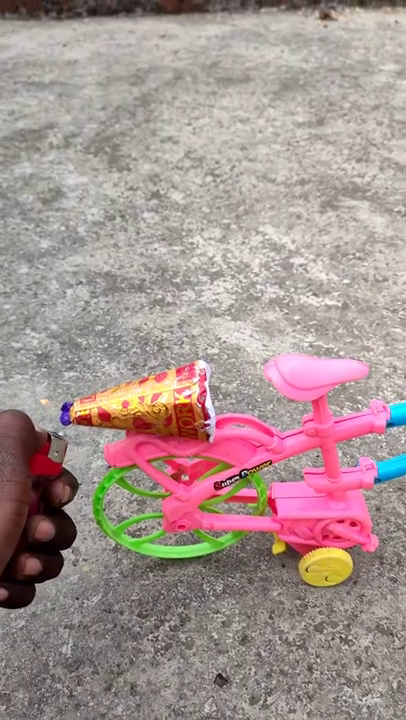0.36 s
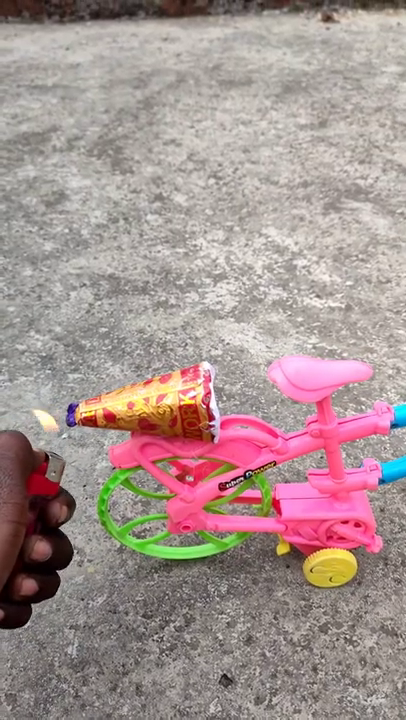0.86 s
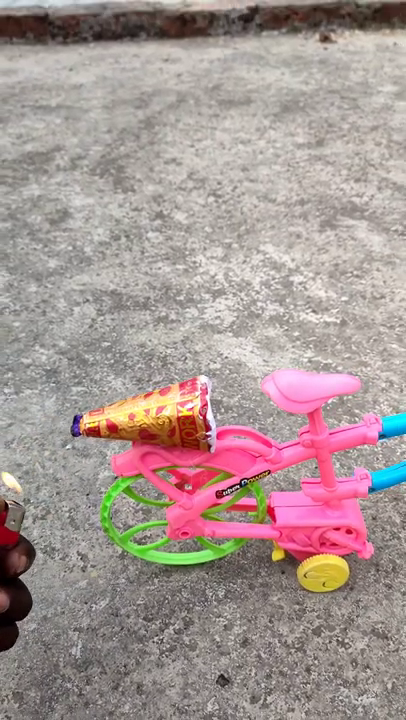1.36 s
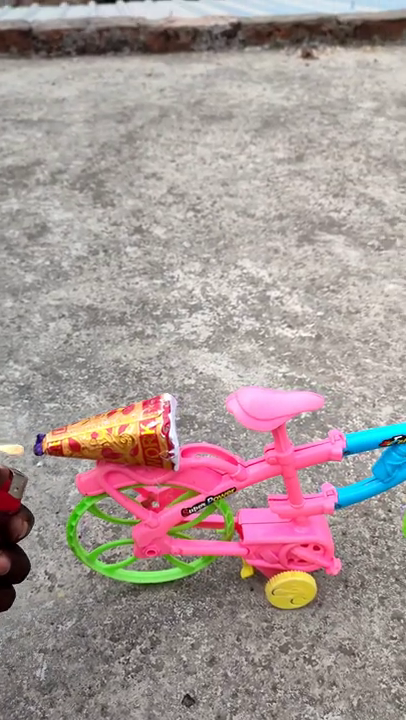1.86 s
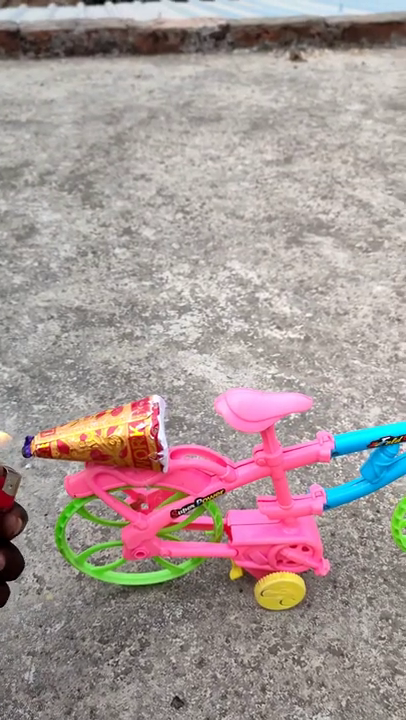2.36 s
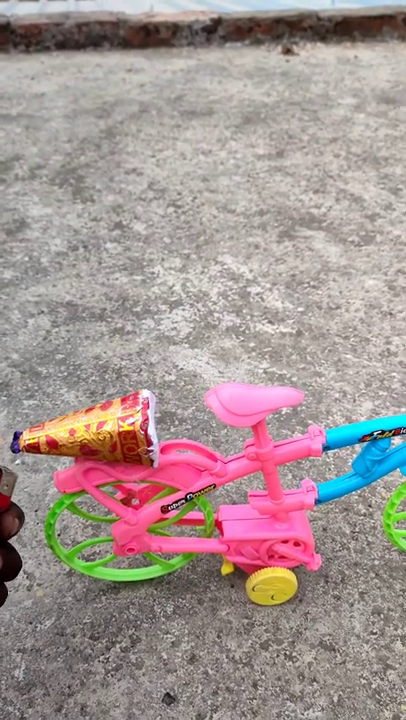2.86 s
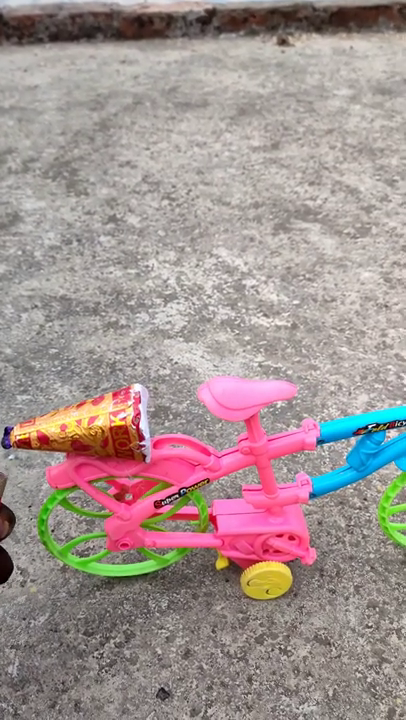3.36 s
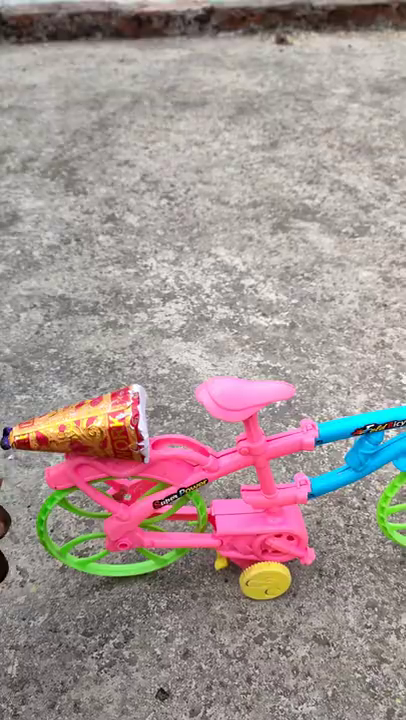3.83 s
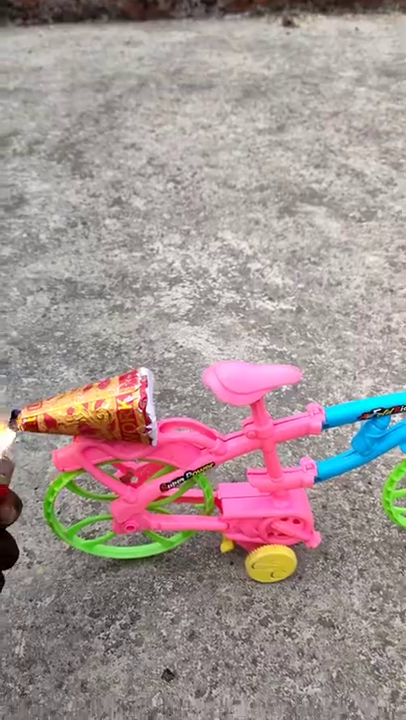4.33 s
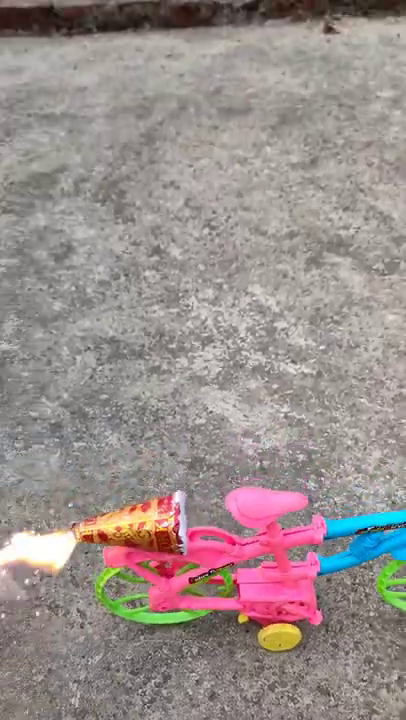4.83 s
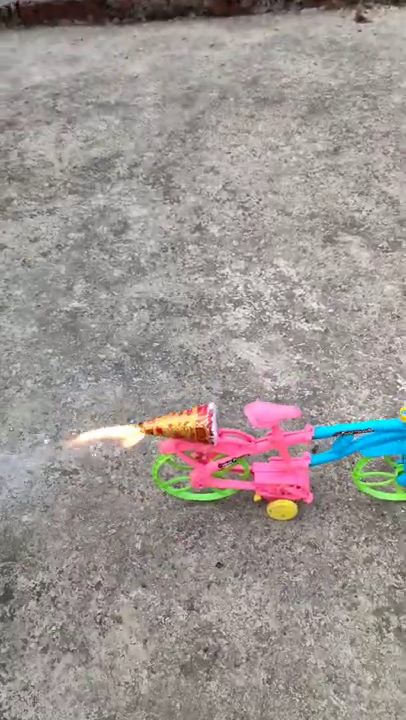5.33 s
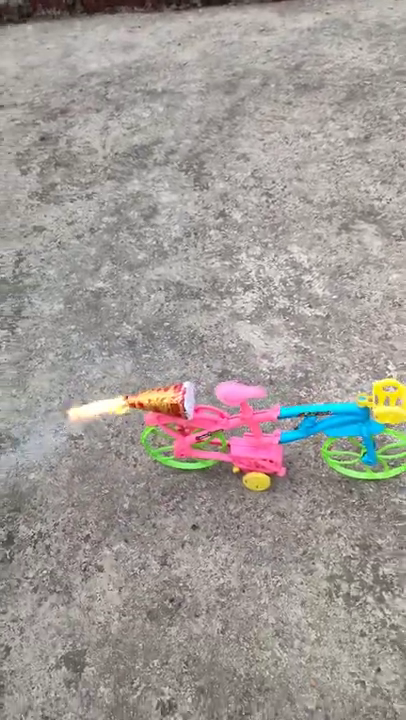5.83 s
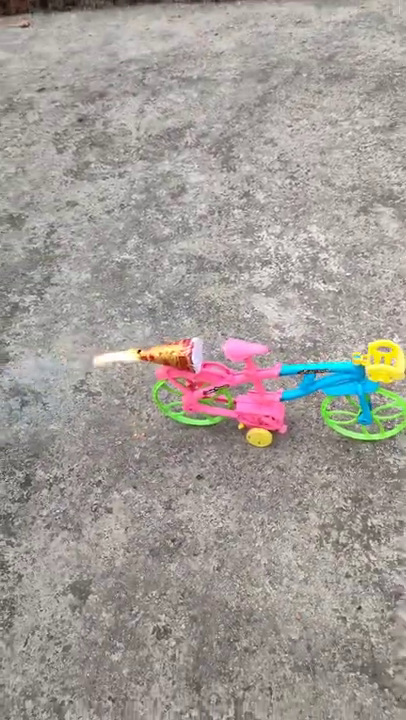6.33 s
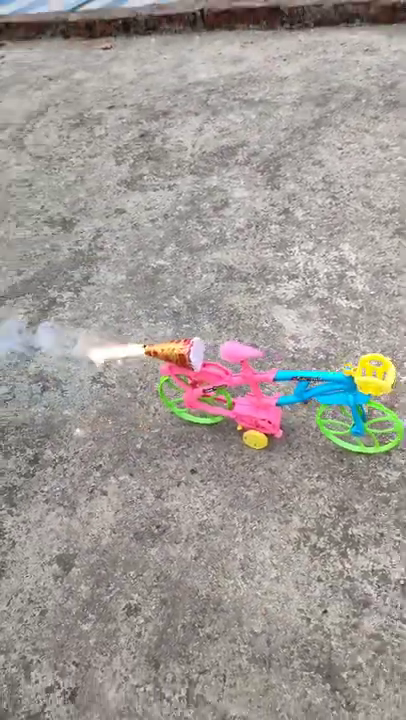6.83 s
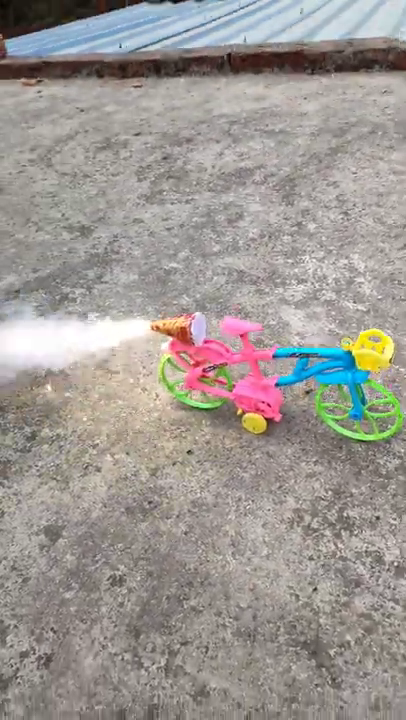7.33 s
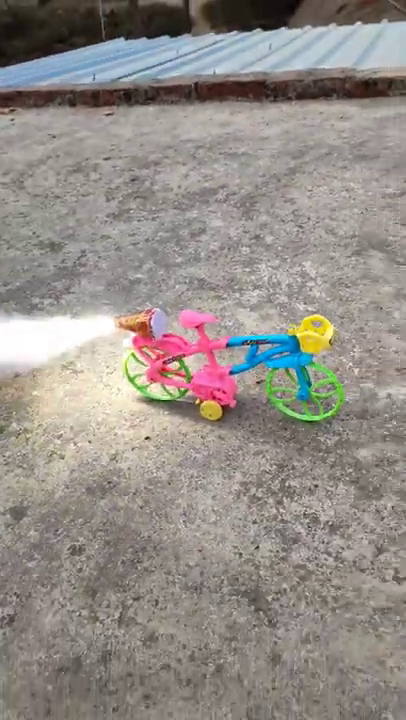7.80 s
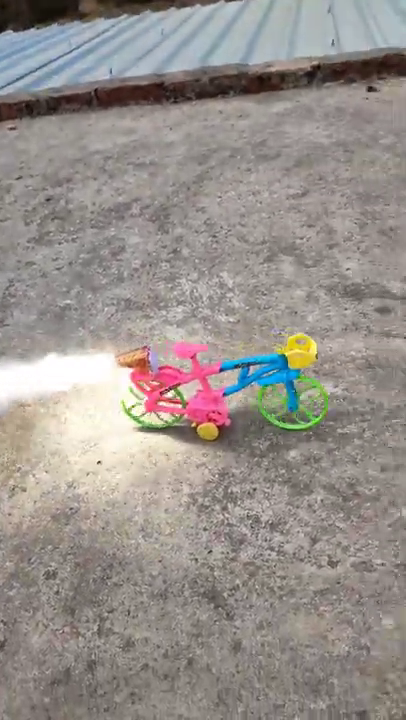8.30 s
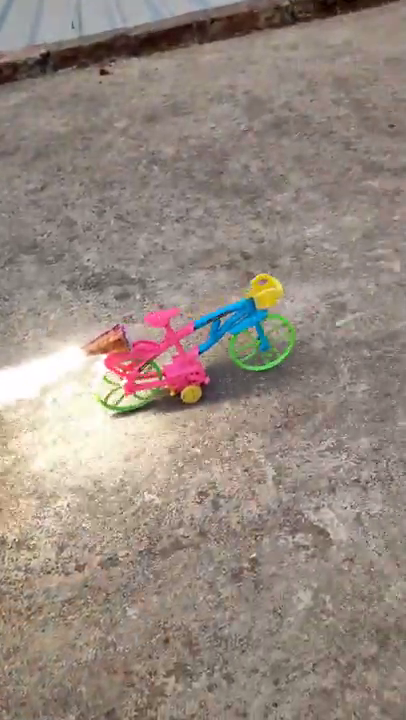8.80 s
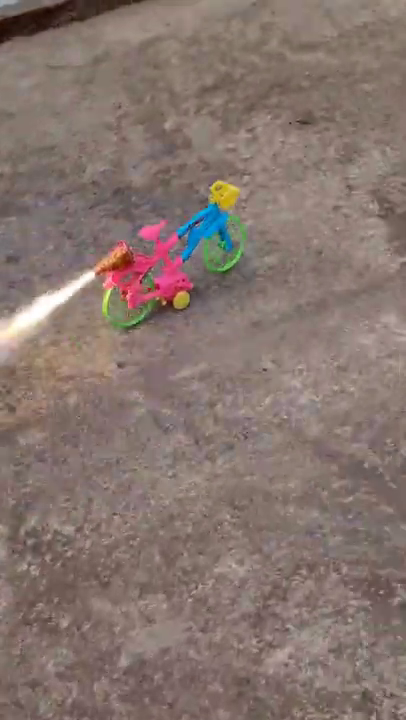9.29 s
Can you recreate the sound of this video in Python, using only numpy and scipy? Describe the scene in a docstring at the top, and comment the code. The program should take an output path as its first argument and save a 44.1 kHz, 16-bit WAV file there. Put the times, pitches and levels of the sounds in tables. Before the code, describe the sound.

Quiet birdsong over distant traffic, then a small firework fuse spits sharp crackles, hisses thinly, and bursts into a loud roaring jet that dies abruptly.

```python
"""Birds whistle, chirp and coo as gliding near-sines over shaped noise for far traffic and wind.
After faint ticks and scrapes the tip of a cone fountain on a toy bicycle lights on a concrete roof:
uneven noise hisses, noise bursts spark. Then the charge catches: a noise jet roars, combed by its
ground echo, swells as the toy turns, and dies away.
Two microphones a hand apart hear the sources with their own colour, level or delay."""
import sys
import numpy as np
from scipy import signal
from scipy.io import wavfile
from scipy.ndimage import uniform_filter1d

SR = 44100
rng = np.random.default_rng(int(sys.argv[2]) if len(sys.argv) > 2 else 0)


def volts(x):
    """Linear amplitude factor 10**(x/20) for a level x in dB, scalar or array-like."""
    e = np.asarray(x, float) / 20
    return 10 ** e


def unload_audio(sound):
    """Save the sound as a 16-bit wav file, at the path given as the first command line argument."""
    columns = np.transpose(np.atleast_2d(sound))
    # keep every value between -1 and 1, then stretch to whole-number steps
    steps = np.round(np.clip(columns, -1, 1) * 32767)
    wavfile.write(sys.argv[1], SR, steps.astype(np.int16))


N = 426447
FRAME = 512  # samples; frames overlap by three quarters
HZ = np.fft.rfftfreq(FRAME, 1 / SR)[:, None]
TIMES = np.arange(4 * N // FRAME + 5) * FRAME / 4 / SR

# Jet spectrum before tilt and comb. Each row: frequency in Hz, left in dB, right in dB.
JET_SPECTRUM = [(60.4, -33, -39), (152, -4.5, -6.5), (258, -1.5, -4.5), (750, 0, -3), (1020, -3.5, -5),
                (2200, -4.5, 7.5), (3000, -5, -7), (3300, -6.5, -8), (4400, -4, -5), (4870, -7, -9.5),
                (6000, -13, -6.5), (6480, -15.5, -13), (7000, -16, -19.5), (7700, -20, -21),
                (10200, -24.5, -19.5), (13800, -31, -23), (16500, -36, -32)]
# Jet likeness of the two sides. Each row: frequency in Hz, likeness 0-1.
JET_LIKENESS = [(300, 1), (800, 0.8), (2200, 0.66), (3300, 0.27), (6000, 0.74), (8000, 0.13)]
# Jet strength. Each row: time in s, level in dB.
JET_LEVEL = [(6.9, -69), (6.97, -37), (7.05, -32.5), (7.11, -33), (7.18, -34), (7.24, -34), (7.32, -26.5),
             (7.5, -20.5), (7.88, -12), (8.09, -12), (8.26, -9), (8.5, -11), (8.61, -12), (8.7, -10),
             (9.03, -10.5), (9.31, -11), (9.46, -17), (9.52, -21.5), (9.59, -33), (9.67, -42.5)]
# Nozzle facing the microphones as the toy turns. Each row: time in s, facing (0 = side-on).
NOZZLE_FACING = [(6.9, -0.26), (8.3, 0.41), (8.62, 0.86), (9.05, 0.96), (9.3, 0.72), (9.48, -0.23),
                 (9.67, 1)]
# Ground echo, moving with toy and microphones. Each row: time in s, first left notch in Hz.
ECHO_NOTCH = [(6.9, 840), (7.17, 900), (7.3, 1170), (7.6, 1300), (8.1, 1240), (8.36, 1086), (9.2, 974),
              (9.67, 1200)]
# Ground echo strength. Each row: frequency in Hz, left factor, right factor.
ECHO_STRENGTH = [(506, 1, 0.85), (1200, 0.73, 0.88), (3200, 0.64, 0.19), (5000, 0.49, 0.025),
                 (8000, 0.19, 0.03)]
# Burning tip spectrum before tilt. Each row: frequency in Hz, left in dB, right in dB.
FLAME_SPECTRUM = [(100, -39, -36), (400, -5, -10), (800, -13, -8), (1500, -10, -2), (2480, -17, 8.5),
                  (2940, -21.5, 3.5), (4500, -17, -2), (5760, -18.5, -2.5), (6500, -33, -15),
                  (8000, -36, -18), (10300, -45, -20.5), (12500, -50, -22.5), (15300, -50, -20)]
# Flame likeness of the two sides. Each row: frequency in Hz, likeness 0-1.
FLAME_LIKENESS = [(300, 1), (1200, 0.095), (2500, 0.38), (4000, 0.29), (7000, 0.065)]
# Burning tip, drifting across. Each row: time in s, level in dB, added left over right in dB.
FLAME_LEVEL = [(4.3, -48.5, 14), (4.7, -41, 21.5), (5, -43, 14), (5.4, -39, 17), (5.55, -40.5, 10.5),
               (6.2, -38.5, 7.5), (6.9, -37, 7.5), (7.3, -33, 19)]
# Bursting sparks. Each row: start in s, peak in dB before panning, centre in Hz,
# added left over right in dB, time to the envelope peak in ms.
SPARK_BURSTS = [(4.566, -25, 5000, -1, .3), (4.6095, -9, 5000, -7, 1.3), (4.7362, -5.5, 3900, 7.5, 1.7),
                (4.7464, -30, 4000, 13, 0.98), (4.8005, -15.5, 4000, 10, 0.54),
                (4.8922, -9, 4800, -10, 0.61), (4.9435, -2, 4670, -5, 0.42), (4.952, -21, 5900, 7, 1.2),
                (4.974, -22.5, 2540, -6, 1.2), (4.999, -10, 4500, 3, 0.46), (5.0256, -13, 4840, -5, 0.85),
                (5.0774, -10, 4760, -8, 1.2), (5.0896, -12, 4500, -11, 2), (5.0948, -3.5, 2630, -9.5, 0.76),
                (5.106, -15, 4000, 6, 1.3), (5.2139, -13, 3000, -11, 0.48), (5.2968, -19, 1690, -20, 0.38),
                (9.4295, -11, 5900, -8, .6), (9.509, -19, 5000, -16, .5)]
# Cone knocks under some bursts. Each row: start in s, level in dB.
CONE_KNOCKS = [(5.0778, -17.5), (5.2136, -20), (5.096, -23), (5.297, -26)]
# Single dry clicks. Each row: start in s, level in dB, left over right in dB.
DRY_CLICKS = [(4.5547, -9.5, 19.5), (4.733, -17, 5)]
# Soft noise puffs: first faint ticks and scrapes, then spurts of the burning tip.
# Each row: centre in s, level in dB, half length at half height in s, frequency in Hz,
# width of each resonance in Hz.
NOISE_PUFFS = [(2.711, -55, .003, 4500, 2500), (3.428, -57, 0.0054, 3500, 4000),
               (3.63, -61, 0.01, 5500, 3000), (3.7, -58, 0.0042, 5000, 7000),
               (3.775, -58, 0.0052, 6000, 7000), (3.837, -59, 0.009, 5000, 7000),
               (4.362, -45, 0.0061, 5400, 3000), (5.197, -32, 0.012, 5570, 1800),
               (5.198, -37.5, 0.013, 2500, 3000), (5.199, -43, .012, 11000, 9000),
               (5.344, -35.5, 0.017, 4500, 4000), (5.345, -44, 0.012, 11000, 9000),
               (5.418, -44, .004, 9000, 9000), (5.997, -41.5, 0.02, 5800, 6100),
               (6.149, -35, 0.014, 5740, 800), (6.354, -36.5, 0.02, 5570, 900),
               (6.36, -41.5, 0.018, 7000, 6000), (6.886, -33, 0.016, 5370, 1200),
               (7.637, -18, 0.0098, 2380, 2010), (9.62, -34.5, 0.0096, 2330, 900)]
# Whistles climbing to a hook, slowing and fading through the phrase. Each row: start in s, length in s.
RISING_WHISTLES = [(0.05, 0.12), (0.231, 0.13), (0.42, 0.15), (0.62, 0.14), (0.819, 0.14), (1.022, .148),
                   (1.236, 0.16), (1.454, 0.178), (1.693, 0.208), (1.968, 0.24), (2.29, 0.24),
                   (2.629, 0.26)]
# Ending of each rising whistle. Each row: time from its end in s, pitch in Hz.
RISE_HOOK = [(-.026, 6770), (0, 6560)]
# Quick upward calls. Each row: reference time in s, level in dB.
WHIP_CALLS = [(0.647, -51.5), (0.975, -50.5), (3.681, -49.5), (4.063, -48.5), (4.426, -43)]
# Shape of an upward call. Each row: time from its reference in s, pitch in Hz, relative level in dB.
WHIP_SHAPE = [(-.015, 2050, -19), (.015, 2250, -12.5), (.034, 2720, -6), (.048, 3206, 7), (.056, 3700, -1),
              (0.075, 3900, 5)]
# Nearest call, up then down. Each row: time in s, pitch in Hz, level in dB.
NEAR_SWOOP = [(3.862, 3590, -56), (3.87, 5300, -40), (3.879, 5980, -47), (3.903, 5100, -38.5),
              (3.926, 4820, -47), (3.95, 3530, -59)]
# Other birds. Each row: start in s, length in s, from Hz, to Hz, level in dB.
CHIRP_NOTES = [(0.24, 0.034, 4280, 5530, -50), (0.267, 0.015, 3740, 3000, -55),
               (0.328, 0.022, 3670, 2980, -53.5), (0.458, 0.014, 3680, 3100, -55),
               (0.52, 0.022, 3080, 3290, -53), (0.843, 0.032, 4700, 4920, -51),
               (0.874, 0.06, 3100, 2490, -59), (1.125, .05, 1950, 2700, -63), (1.89, .03, 3130, 3140, -61),
               (2.044, 0.077, 3870, 2500, -54.5), (2.377, 0.041, 5100, 4730, -53),
               (2.518, 0.06, 3190, 2410, -55), (2.608, 0.046, 3300, 2670, -57),
               (2.792, 0.053, 3170, 2680, -58), (3.836, .022, 4300, 6100, -51),
               (3.432, 0.024, 4200, 4900, -56), (3.742, .014, 4400, 5000, -54),
               (3.465, 0.022, 3450, 3750, -57), (5.027, 0.037, 4100, 4560, -39),
               (6.149, 0.047, 4560, 3840, -46)]
# Notes that hold, then bend. Each row: start in s, length in s, from Hz, to Hz, level in dB.
BENT_NOTES = [(.715, .042, 4450, 4300, -63), (1.513, .09, 1286, 1230, -58), (1.943, 0.065, 3880, 3960, -63),
              (3.143, 0.068, 3460, 3210, -52), (3.235, 0.058, 3590, 3470, -56.5),
              (3.998, 0.031, 3330, 2950, -60), (4.118, 0.046, 6200, 6160, -65),
              (4.135, 0.057, 3150, 2780, -62), (6.434, 0.062, 3330, 3120, -43),
              (6.628, 0.07, 3480, 3200, -44.5)]
# Hoarse squawks, mostly falling. Each row: start in s, length in s, from Hz, to Hz, level in dB.
HOARSE_SQUAWKS = [(1.545, .05, 3850, 3100, -58), (1.595, .065, 3600, 2400, -57),
                  (2.335, .065, 4500, 3750, -59), (2.722, .062, 4900, 2800, -56),
                  (2.972, .05, 3100, 4350, -60), (4.432, .03, 4200, 3500, -52)]
# Far dove. Each row: start in s, length in s, from Hz, to Hz, level in dB.
DOVE_COOS = [(.4, 0.2, 612, 571, -57.5), (.68, 0.13, 515, 509, -59), (1.78, 0.29, 620, 600, -59.5),
             (2.04, 0.075, 600, 593, -57), (2.93, 0.23, 527, 531, -56.5)]
# Distant traffic and wind spectrum. Each row: frequency in Hz, left in dB, right in dB.
AIR_SPECTRUM = [(40, -2.5, -0.5), (80, -1, -1.5), (196, -4, -2.5), (560, -6.5, -7), (900, -10.5, -9.5),
                (1510, -11, -12.5), (2500, -16, -14), (4000, -16, -17.5), (6030, -20, -20.5),
                (6700, -34, -34), (7860, -24, -26.5), (9800, -36.5, -37), (15000, -37, -35)]
# Its likeness of the two sides. Each row: frequency in Hz, likeness 0-1.
AIR_LIKENESS = [(60, 1), (400, 0.89), (1000, 0.8), (6500, 0), (7500, 0.22)]
# Its strength. Each row: time in s, level in dB.
WASH_LEVEL = [(0, -52.5), (3.9, -54), (4.2, -52.5), (4.38, -47), (5.2, -46), (9.67, -46.5)]

JET_PAN_DB, JET_PAN_FACING_DB = -4, 8  # left over right side-on, and its change when facing
ROAR_DB, ROAR_FACING_DB, FIZZ_DB, FIZZ_FACING_DB = -0.82, -2, -4.5, 16.5  # bass and treble likewise
CATCH_S, CATCH_FADE_S = 6.99, 0.52  # hollow while the charge catches: more bass and treble
CATCH_ROAR_DB, CATCH_FIZZ_DB = 11, 25.5
ROAR_ON_S, ROAR_ON_RISE_S, THIN_DB = 7.26, 0.016, -2.5  # thin bass until the jet takes hold
BEAM_HZ, BEAM_WIDTH_HZ, BEAM_FACING_DB = 5750, 1100, 3  # a bright band beams along the jet
RIGHT_NOTCH_RATIO = 1.225
SPARK_SHARPNESS, SPARK_LOW_HZ = 2.4, 1450
DIP_HZ, DIP_WIDTH_HZ, DIP_SHARE = 7300, 2500, 0.33  # the microphones dull the cracks here
EMBER_THRESHOLD_PER_S, EMBER_SHARE, EMBER_T60_S = 240, 0.48, 0.037  # crumbs ticking after a burst
KNOCK_HZ, KNOCK_RISE_S, KNOCK_T60_S = 620, 0.0011, 0.022
RATTLE_SHARE, RATTLE_HZ, RATTLE_WIDTH_HZ, RATTLE_T60_S = 0.77, 1430, 880, 0.032
CLICK_ZERO_S = 0.00007  # time to the first zero after the start
RISE_LOW_HZ, RISE_LIFT_HZ_PER_S, RISE_SCOOP_HZ, RISE_KNEE_HZ = 4920, 58, 281, 5800
RISE_DB, RISE_FADE_DB_PER_S = -58, -1.5
RASP = 1.4  # a hoarse throat spreads a note into a band
CHIRP_PAN_DB = -5
CHATTER_NOTES, CHATTER_DB, CHATTER_SPREAD_DB = 300, -69, 5
RUMBLE_DB, RUMBLE_DB_PER_DB = 5, 0.1  # extra rumble at -47 dB, and how it follows the level


def evened(x):
    """Scales to unit rms."""
    return x / np.sqrt(np.mean(x ** 2) + 1e-20)


def over_hz(table):
    """Reads each column of a spectrum at every bin, on a log frequency scale."""
    hz, *columns = np.transpose(table)
    return np.array([np.interp(np.log(HZ + 1), np.log(hz + 1), c) for c in columns])


def over_time(table):
    """Reads each column of a curve at every frame."""
    s, *columns = np.transpose(table)
    return [np.interp(TIMES, s, c) for c in columns]


def sides(pan_db):
    """Gives half of a left-over-right difference to each side, as factors."""
    return volts(np.array([pan_db / 2, -pan_db / 2]))


def decay(t, t60_s):
    """Exponential decay, 60 dB down after t60_s."""
    return volts(-60 * t / t60_s)


def add(mix, start_s, sound):
    """Mixes a stereo sound in at a time."""
    part = mix[:, round(start_s * SR):][:, :sound.shape[1]]
    part += sound[:, :part.shape[1]]


def ring(x, hz, width_hz):
    """One resonance, peak gain 1."""
    return signal.lfilter(*signal.iirpeak(hz, max(hz / width_hz, .3), SR), x)


def noise(shape, level_db, likeness, lag_ms, band_hz, patchy_db, flicker_db):
    """Shaped stereo noise, partly shared with a lag, in patches and flickers; level set in band_hz."""
    a, b, c, d, patches = rng.standard_normal((len(TIMES), len(HZ), 5)).T
    patches = uniform_filter1d(patches, size=4, axis=0)  # over frequency
    patches = evened(uniform_filter1d(patches, size=16, axis=1))  # over time
    flicker = evened(uniform_filter1d(rng.standard_normal(len(TIMES)), size=3))
    same = np.clip(over_hz(likeness)[0], 0, 1)
    left = a + 1j * b
    late = left * np.exp(-2j * np.pi * HZ * lag_ms / 1000)
    right = same * late + np.sqrt(1 - same ** 2) * (c + 1j * d)
    inside = ((HZ > band_hz[0]) & (HZ < band_hz[1]))[:, 0]
    shape = shape / np.sqrt((abs(shape[:, inside]) ** 2).sum(1).mean(0))
    gain = volts(level_db + patchy_db * patches + flicker_db * flicker)
    z = np.array([left, right]) * shape * gain
    return signal.istft(z, nperseg=FRAME, noverlap=3 * FRAME // 4)[1][:, :N]


def jet():
    """Turbulent gas, heard directly and off the ground: the two paths cancel in a comb."""
    (level_db,), (facing,), (notch_hz,) = map(over_time, (JET_LEVEL, NOZZLE_FACING, ECHO_NOTCH))
    catching = np.exp(-(np.maximum(TIMES - CATCH_S, 0) / CATCH_FADE_S) ** 2)
    pan_db = JET_PAN_DB + JET_PAN_FACING_DB * facing
    roar_db = ROAR_DB + ROAR_FACING_DB * facing + CATCH_ROAR_DB * catching
    roar_db = roar_db + THIN_DB / (1 + np.exp((TIMES - ROAR_ON_S) / ROAR_ON_RISE_S))
    fizz_db = FIZZ_DB + FIZZ_FACING_DB * facing + CATCH_FIZZ_DB * catching
    tilt_db = roar_db / (1 + (HZ / 1000) ** 4) + fizz_db / (1 + (6000 / (HZ + 1)) ** 4)
    tilt_db = tilt_db + BEAM_FACING_DB * facing * np.exp(-((HZ - BEAM_HZ) / BEAM_WIDTH_HZ) ** 2)

    delay_s = 1 / (2 * np.array([notch_hz, RIGHT_NOTCH_RATIO * notch_hz])[:, None])
    comb = 1 + np.clip(over_hz(ECHO_STRENGTH), 0, .95) * np.exp(-2j * np.pi * HZ * delay_s)
    shape = comb * volts(over_hz(JET_SPECTRUM) + tilt_db) * sides(pan_db)[:, None]
    level_db = np.where(TIMES > JET_LEVEL[0][0], level_db, -150)
    gas = noise(shape, level_db, JET_LIKENESS, .045, (1500, 6000), 1.4, .9)

    # eddies roughen it over milliseconds
    churn = evened(signal.lfilter([1], [1, -.97], rng.standard_normal(N)))
    gas = gas * volts(0.97 * churn)
    # strong waves grow lopsided: sharp dips, blunt crests
    local_rms = np.sqrt(abs(uniform_filter1d(gas ** 2, size=2000)) + 1e-12)
    steep = gas - 0.033 * (gas ** 2 / local_rms - local_rms)
    return signal.sosfilt(signal.butter(2, 110, "high", fs=SR, output="sos"), steep)


def flame():
    """The tip burns with a thin uneven hiss that starts suddenly, brighter towards the left."""
    level_db, pan_db = over_time(FLAME_LEVEL)
    tilt_db_per_octave = -0.7 + 0.4 * pan_db
    lit = (TIMES > 4.347) & (TIMES < FLAME_LEVEL[-1][0])
    tilt_db = tilt_db_per_octave * np.log2((HZ + 1) / 3000)
    shape = volts(over_hz(FLAME_SPECTRUM) + tilt_db) * sides(pan_db)[:, None]
    return noise(shape, np.where(lit, level_db, -150), FLAME_LIKENESS, .33, (2000, 6000), 2.2, 1.2)


def sparks():
    """Sparks burst as short resonant noise cracks, doubled by the ground, then crumbs tick on."""
    mix, t = np.zeros((2, N)), np.arange(2000) / SR
    ember_threshold = np.sqrt(-2 * np.log(EMBER_THRESHOLD_PER_S / SR)) - .5
    hisses = rng.standard_normal((len(SPARK_BURSTS), 3, len(t)))
    for (start_s, db, hz, pan_db, rise_ms), hiss in zip(SPARK_BURSTS, hisses):
        u = 1000 * t / rise_ms
        envelope = (u * np.exp(1 - u)) ** SPARK_SHARPNESS + 0.34 * decay(t, 0.039)
        burst = (hiss[0] + hiss[1:]) * envelope
        embers = signal.lfilter([1], [1, -.9], abs(hiss[1]) > ember_threshold) * (t > .005)
        burst = burst + EMBER_SHARE * hiss[0] * embers * decay(t, EMBER_T60_S)
        burst = burst + 0.12 * np.roll(burst, shift=15, axis=1)  # ground echo
        crack = ring(ring(burst, hz, 2100), hz, 2100)
        crack = crack + 0.75 * ring(burst, 5250, 3200) + 0.16 * np.diff(burst, prepend=0)
        crack = crack - DIP_SHARE * ring(crack, DIP_HZ, DIP_WIDTH_HZ)
        crack = signal.lfilter(*signal.butter(2, SPARK_LOW_HZ, "high", fs=SR), crack)
        add(mix, start_s, volts(db) * crack / abs(crack.mean(0)).max() * sides(pan_db)[:, None])
    return mix


def knocks():
    """The cone thumps as a decaying sine while its paper shell rattles as resonant noise."""
    mix, t = np.zeros((2, N)), np.arange(2000) / SR
    thump = np.minimum(t / KNOCK_RISE_S, 1) * decay(t, KNOCK_T60_S) * np.sin(2 * np.pi * KNOCK_HZ * t)
    for (start_s, db), hiss in zip(CONE_KNOCKS, rng.standard_normal((len(CONE_KNOCKS), 2, len(t)))):
        rattle = evened(ring(hiss, RATTLE_HZ, RATTLE_WIDTH_HZ)) * decay(t, RATTLE_T60_S)
        add(mix, start_s, volts(db) * (thump + RATTLE_SHARE * rattle))
    return mix


def clicks():
    """Dry clicks: one sharp dip of pressure, then a blunt rebound."""
    mix, u = np.zeros((2, N)), np.arange(2000) / SR / CLICK_ZERO_S
    pulse = (u - 1) * np.exp(-u) * np.minimum(u * 2, 1) * 2
    for start_s, db, pan_db in DRY_CLICKS:
        add(mix, start_s, volts(db) * sides(pan_db)[:, None] * pulse)
    return mix


def puffs():
    """Faint ticks and scrapes, then spurts of the tip: swelling noise through three equal resonances."""
    mix = np.zeros((2, N))
    hisses = rng.standard_normal((len(NOISE_PUFFS), 2, SR // 5))
    for (centre_s, db, half_s, hz, width_hz), hiss in zip(NOISE_PUFFS, hisses):
        swell = np.hanning(round(4 * half_s * SR))
        for _ in range(3):
            hiss = ring(hiss, hz, width_hz)
        puff = evened(hiss)[:, :len(swell)] * swell
        add(mix, centre_s - 2 * half_s, volts(db) * sides(-9.5)[:, None] * puff)
    return mix


def whistle(s, hz, db, pan_db, fade=.5, rough=0., lag_samples=12):
    """A near-sine along a pitch path, fluttering and rasping when rough, later at the right."""
    t = np.arange(s[0], s[-1], 1 / SR)
    pitch_share = min(hz[0] / 3500, 1)  # low notes waver and rasp less
    waver, flutter = (evened(uniform_filter1d(v, size=130)) for v in rng.standard_normal((2, len(t))))
    pitch_hz = np.interp(t, s, hz) * (1 + 0.053 * rough * waver * pitch_share)
    turns = np.cumsum(pitch_hz) / SR
    level = volts(np.interp(t, s, db) + 7.4 * rough * flutter) * signal.windows.tukey(len(t), min(fade, 1))
    grain = uniform_filter1d(uniform_filter1d(rng.standard_normal(len(t)), size=40), size=40)
    rasp = RASP * rough ** 2 * evened(grain) * pitch_share
    level = level * (1 + rasp) / np.sqrt(1 + np.mean(rasp ** 2))
    tone = np.sqrt(2) * level * np.sin(2 * np.pi * turns)
    return s[0], sides(pan_db)[:, None] * np.array([tone, np.roll(tone, shift=lag_samples)])


def glide(start_s, length_s, from_hz, to_hz, db, pan_db, rough, bend=0.85, lag_samples=12):
    """One gliding note; bend is the share of the glide done by its middle."""
    bend_hz = from_hz + bend * (to_hz - from_hz)
    s = [start_s, start_s + 0.49 * length_s, start_s + length_s]
    return whistle(s, [from_hz, bend_hz, to_hz], [db, db, db], pan_db, 0.42, rough, lag_samples)


def rising_phrase(mix):
    """Whistles scoop up, climb a slope and end in a hook, each higher at its foot and fainter."""
    (top_s, top_hz), (last_s, last_hz) = RISE_HOOK
    for start, length in RISING_WHISTLES:
        end = start + length
        low_hz = RISE_LOW_HZ + RISE_LIFT_HZ_PER_S * start
        s = [start, start + .03, end - .068, end - .044, end + top_s, end + last_s]
        hz = [low_hz, low_hz + RISE_SCOOP_HZ, RISE_KNEE_HZ, (RISE_KNEE_HZ + top_hz) / 2, top_hz, last_hz]
        db = RISE_DB + RISE_FADE_DB_PER_S * start + np.array([-11.0, 5.5, 6.0, -4.0, -4.0, 0.0])
        add(mix, *whistle(s, hz, db, 8.4, 0.18, .12))


def chatter(mix):
    """Faint, rough, falling far notes at random times."""
    for when, length, pitch, bend, size, side in rng.random((CHATTER_NOTES, 6)):
        hz = 2500 + 2300 * pitch
        to_hz = hz * (0.62 + 0.129 * bend)
        db = CHATTER_DB + CHATTER_SPREAD_DB * size
        add(mix, *glide(when * (N / SR), .012 + 0.036 * length, hz, to_hz, db, 12 * side - 8, 0.76))


def scatter(calls):
    """Short outdoor echoes as decaying noise, smeared by moving air and leaves."""
    t = np.arange(SR // 4) / SR
    echoes = rng.standard_normal((2, len(t))) * decay(t, 0.48) * (t > .008)
    echoes = echoes / np.linalg.norm(echoes[0])
    stir = evened(uniform_filter1d(rng.standard_normal((2, N)), size=400))
    return volts(-8.0) * stir * signal.oaconvolve(calls, echoes, axes=1)[:, :N]


def birds():
    """All calls are pitch glides, over a faint far chatter, with their outdoor scatter."""
    mix = np.zeros((2, N))
    rising_phrase(mix)
    s, hz, shape_db = np.transpose(WHIP_SHAPE)
    for start_s, db in WHIP_CALLS:
        add(mix, *whistle(start_s + s, hz, db + shape_db, 0, 0.15, 0.24, lag_samples=0))
    for row in CHIRP_NOTES:
        add(mix, *glide(*row, CHIRP_PAN_DB, rough=.33))
    for row in BENT_NOTES:
        add(mix, *glide(*row, CHIRP_PAN_DB, rough=.12, bend=.3, lag_samples=0))
    for row in HOARSE_SQUAWKS:
        add(mix, *glide(*row, CHIRP_PAN_DB, rough=.62, bend=0.37))
    add(mix, *whistle(*np.transpose(NEAR_SWOOP), -11.0, 0.063, rough=.24))
    for row in DOVE_COOS:
        add(mix, *glide(*row, pan_db=0, rough=.25))
    chatter(mix)
    return mix + scatter(mix)


def air():
    """Distant traffic and wind: a dull noise wash whose rumble swells more than the rest."""
    level_db, = over_time(WASH_LEVEL)
    rumble_db = RUMBLE_DB + RUMBLE_DB_PER_DB * (level_db + 47)
    shape = volts(over_hz(AIR_SPECTRUM) + rumble_db / (1 + (HZ / 150) ** 4))
    return noise(shape, level_db, AIR_LIKENESS, .29, (200, 900), 1.6, .8)


def scene():
    """Everything on the roof."""
    return jet() + flame() + sparks() + knocks() + clicks() + puffs() + birds() + air()


def band_limit(x):
    """A steep low-pass at the top of the band."""
    return signal.sosfilt(signal.butter(12, 16500, fs=SR, output="sos"), x)


def record(dry):
    """The sound fades in, passes the microphone band of 60 to 15300 Hz, and peaks past full scale clip."""
    fade = np.minimum(np.arange(N) / (.06 * SR) + 0.1, 1)
    passed = signal.sosfilt(signal.butter(2, 60, "high", fs=SR, output="sos"), dry * fade)
    lowpass = signal.firwin(301, 15300, window=("kaiser", 8), fs=SR)
    passed = signal.oaconvolve(passed, lowpass[None], "same")
    return band_limit(np.clip(passed, -1, 1))


dry = scene()
out = record(dry)
unload_audio(out)
```